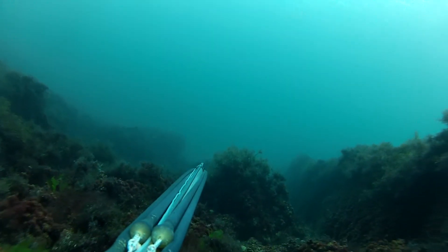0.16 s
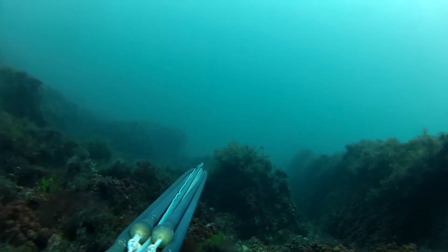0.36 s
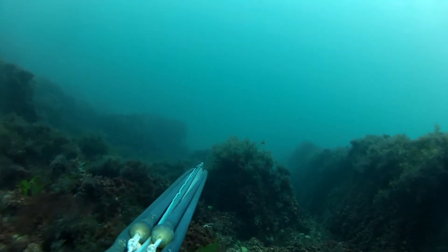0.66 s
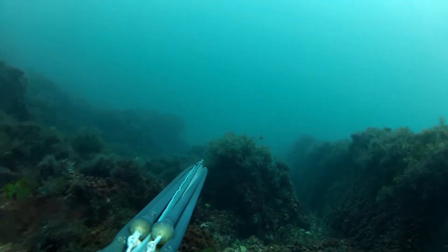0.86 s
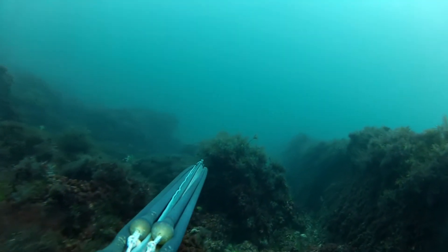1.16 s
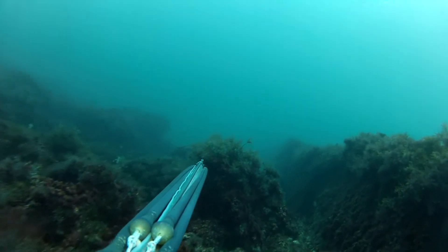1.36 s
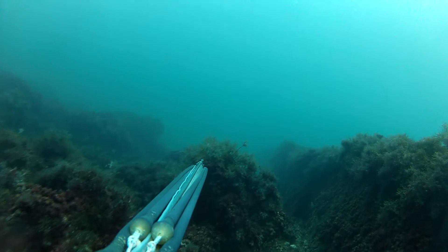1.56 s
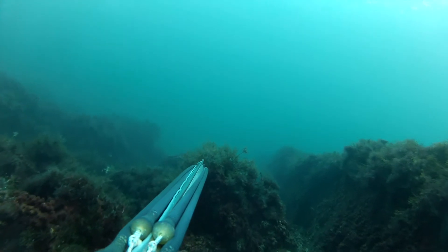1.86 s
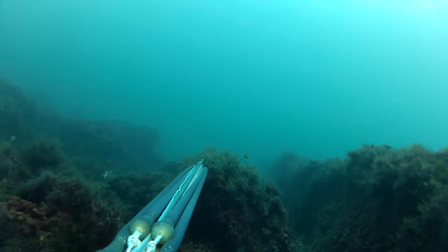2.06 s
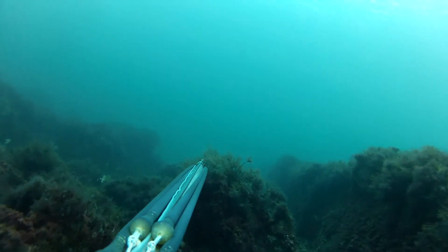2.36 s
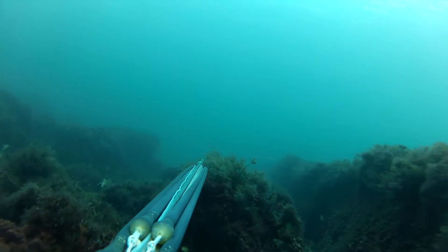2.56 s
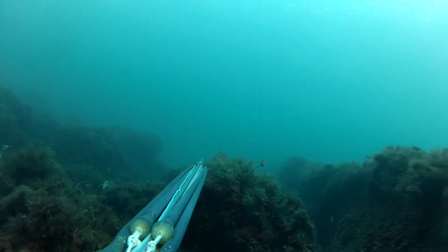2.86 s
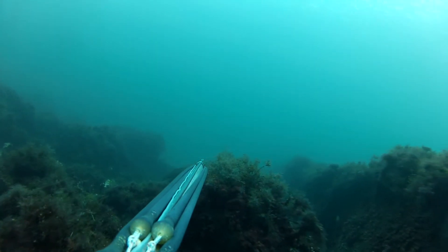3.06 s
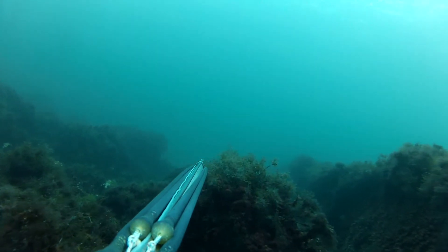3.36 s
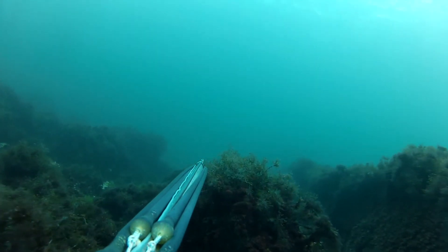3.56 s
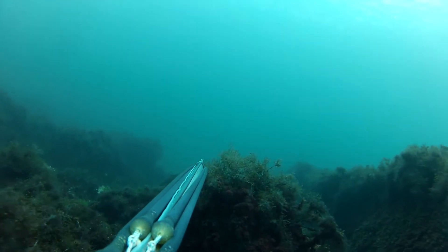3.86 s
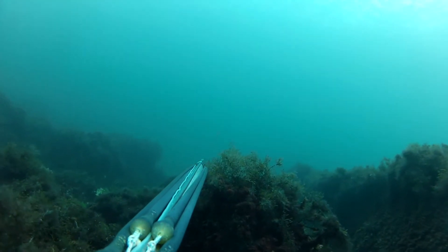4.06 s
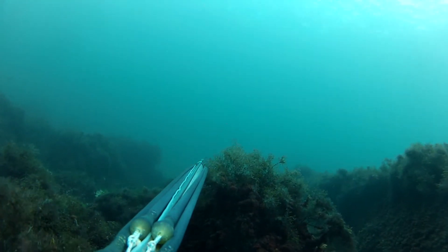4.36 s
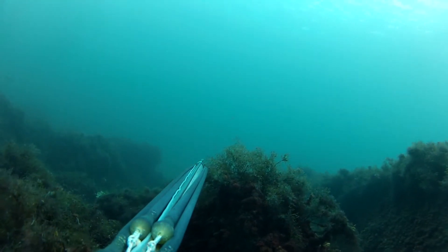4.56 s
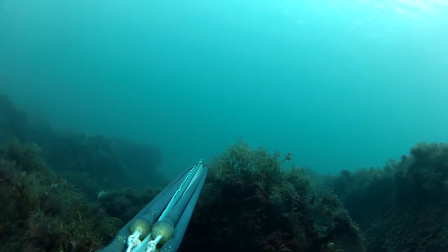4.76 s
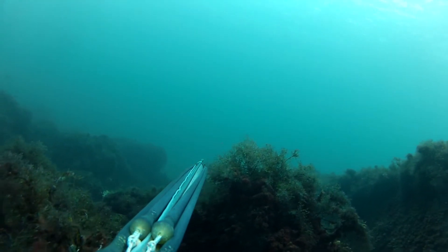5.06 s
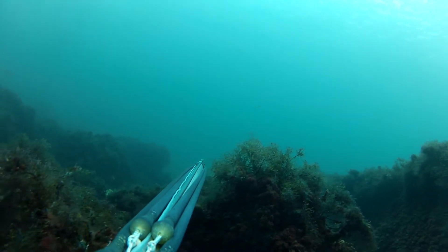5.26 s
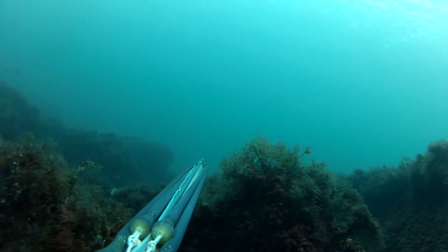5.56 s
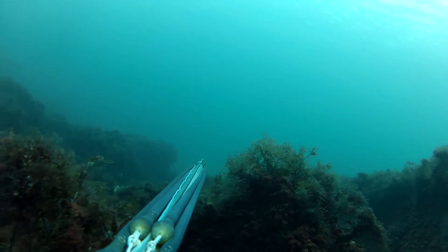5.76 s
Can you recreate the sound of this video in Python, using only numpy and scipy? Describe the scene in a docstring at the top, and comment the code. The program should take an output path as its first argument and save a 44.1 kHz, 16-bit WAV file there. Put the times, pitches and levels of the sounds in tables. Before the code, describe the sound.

A diver glides over a rocky reef with a speargun. Random small clicks crackle throughout above a soft, deep water rumble. Gear bumps its mount with short ringing thuds, first before one second, loudest around it and again near two. Rubber then squeals briefly after three seconds amid scraping and stuttering, before calming to ticks and faint bumps. The microphone is enclosed, so everything is dry, muffled and resonant.

```python
"""Over a reef, a diver glides along with a speargun, heard from inside a sealed camera housing.
Random clicks ring the housing's modes as shrimp crackle; coloured noise rumbles as water moves below.
The gear scrapes, judders, knocks and drags on its ringing mount, and rubber squeaks under the grip
as gliding notes and rasps. Held samples mirror the sound into a glassy treble."""
import sys
import numpy as np
from scipy import signal
from scipy.fft import rfft, irfft
from scipy.io import wavfile
from scipy.ndimage import uniform_filter1d

SR = 44100
rng = np.random.default_rng(int(sys.argv[2]) if len(sys.argv) > 2 else 0)


def wrap_up_sound(samples):
    """Save the sound to the file named by the first command line argument, as 16-bit audio."""
    columns = np.atleast_2d(samples).T
    # keep every value between -1 and 1, then stretch to whole-number steps
    tamed = np.clip(columns, -1, 1)
    steps = np.round(tamed * 32767).astype(np.int16)
    wavfile.write(sys.argv[1], SR, steps)


N = 260190
TIME = np.arange(N) / SR
TAIL = TIME[:SR // 3]  # time axis of one struck sound

# modes of the housing: pitch_hz, level_db (relative), t60_s
HOUSING = [(479, -6.5, 0.023), (774, -13, 0.047), (1020, 0, 0.0017), (1248, -10.5, 0.033),
           (1544, -13, 0.037), (1764, -1, 0.01), (2005, -6, 0.014), (2201, 2, 0.008), (2480, -0.5, 0.0064),
           (2740, -9.5, 0.011), (3570, -5, 0.0063), (4230, -10, 0.0033), (5210, -11, 0.0021)]
HOUSING_HZ = np.array(HOUSING)[:, 0]


def from_db(db):
    """Decibels to gain."""
    return 10 ** (np.asarray(db) / 20)


def rms_one(x):
    """Scale to unit power."""
    return x / np.sqrt(np.mean(x ** 2) + 1e-20)


def peak_one(x):
    """Scale to unit peak."""
    return x / (np.abs(x).max() + 1e-20)


def in_time(rows):
    """Each column of a curve at every sample."""
    s, *columns = np.transpose(rows)
    return [np.interp(TIME, s, column) for column in columns]


def add(out, start_s, sound):
    """Mix a sound in at its start time."""
    at = max(0, round(start_s * SR))
    out[at:at + len(sound)] += sound[:max(0, N - at)]


def noise(spectrum):
    """Steady noise of the given colour (rows of Hz and dB), rms 1."""
    hz, db = np.transpose(spectrum)
    grid = np.maximum(np.arange(N // 2 + 1) * SR / N, 1)
    gains = from_db(np.interp(np.log(grid), np.log(hz), db))
    return rms_one(irfft(rfft(rng.standard_normal(N)) * gains, N))


def mode(hz, t60):
    """One dying sine, down 60 dB after t60 seconds."""
    return np.sin(2 * np.pi * hz * TAIL) * np.exp(-np.log(1000) * TAIL / t60)


def ringing(modes, spread_db=0, colour_db=0):
    """A body's answer to one blow: its modes ring together, their strengths varied at random by spread_db."""
    hz, db, t60 = np.transpose(modes)
    gains = from_db(db + colour_db + spread_db * rng.standard_normal(len(hz)))
    # neighbouring modes start in opposite directions
    return sum((-1) ** k * gains[k] * mode(hz[k], t60[k]) for k in range(len(hz)))


def grains(per_s, size_db):
    """Random clicks of either sign, many small and a few large."""
    sizes = from_db(size_db * np.minimum(rng.exponential(1, N), 4))
    happens = rng.random(N) < per_s / SR
    return happens * sizes * rng.choice([-1, 1], N)


def click(colour_db, scatter, scatter_s):
    """A sharp pulse and its dense, dying reflections ring the housing; peak 1."""
    t = TAIL[:SR // 25]
    pulse = scatter * rng.standard_normal(len(t)) * np.exp(-t / scatter_s)
    pulse[0] += 1
    body = ringing(HOUSING, spread_db=4.5, colour_db=colour_db)
    return peak_one(signal.fftconvolve(pulse, body)[:len(TAIL)])


def wander():
    """Slow chance at the pace of the eddies, rms 1."""
    eddy_hz = 6
    return noise([(eddy_hz / 2, -10), (eddy_hz, 0), (10 * eddy_hz, -60), (SR, -200)])


def water():
    """The housing sways in the flow and eddies wash over it: two bands of noise with wandering levels."""
    # water flowing past: time_s, sway_db, wash_db
    flow = [(0.0, -54.5, -58), (0.8, -53.5, -57.5), (1.3, -55, -57.5), (1.9, -56, -56), (2.5, -55.5, -59),
            (3.3, -52, -58.5), (4.15, -58.5, -59), (4.8, -61, -57.5), (5.9, -58.5, -59.5)]
    # deep spectrum of the sway: frequency_hz, density_db (relative, per Hz)
    sway_spectrum = [(10, -8.5), (20, 9), (26, 4), (33, 0.5), (50, -8), (80, -55)]
    # broader spectrum of the wash: frequency_hz, density_db (relative, per Hz)
    wash_spectrum = [(30, -33), (60, 0), (90, 1.5), (140, -0.5), (250, -0.5), (470, -4.5), (620, -13),
                     (760, -12), (1000, -16), (2000, -23)]
    sway_wander_db, wash_wander_db = 1, 1.5
    sway_db, wash_db = in_time(flow)
    sway = from_db(sway_db + sway_wander_db * wander()) * noise(sway_spectrum)
    wash = from_db(wash_db + wash_wander_db * wander()) * noise(wash_spectrum)
    return sway + wash


def reef():
    """Countless far shrimp make a dull fizz; ticks stand out of it, each direction ringing the housing its way."""
    # the distant crackle: time_s, level_db
    crackle_levels = [(0.0, -60.5), (1.0, -65.5), (1.41, -63), (2.0, -61.5), (2.22, -62), (3.2, -61),
                      (4.78, -61), (5.6, -69), (5.9, -54.5)]
    level_db, = in_time(crackle_levels)
    octaves = np.log2(HOUSING_HZ / 2000)
    dull_housing = ringing(HOUSING, colour_db=-1.5 * octaves)
    fizz = signal.oaconvolve(grains(per_s=1500, size_db=2.0), dull_housing)[:N]
    ticks = np.zeros(N)
    for _ in range(6):  # directions
        shrimp = grains(per_s=22, size_db=3.2)
        ticks += signal.oaconvolve(shrimp, click(0, scatter=0.17, scatter_s=0.0015))[:N]
    crackle = 0.72 * rms_one(fizz) + 0.7 * rms_one(ticks)
    return from_db(level_db) * crackle


def snaps():
    """Near snaps and fainter random strays click on the housing, each with its own share of treble and bass."""
    # the nearest snaps and ticks: start_s, peak_db, treble_db, bass_db (colours relative to the middle)
    near = [(0.0084, -33.5, -5, -4), (0.1509, -35.5, -3, 3), (0.2191, -39, -13, 10), (0.2525, -38, 3, 10),
            (0.2724, -38, 6, 13), (0.3669, -39.5, 3, -13), (0.3769, -38.5, -10, 15),
            (0.4214, -39.5, 23, -8), (0.5665, -33, -6, 1), (0.6125, -39.5, 7, -7), (0.7023, -42.5, 4, 9),
            (0.996, -39, 21, -13), (1.0583, -37.5, 3.5, -7), (1.1722, -38.5, -3, 5.5),
            (1.4883, -33.5, -3, -3), (1.9031, -30.5, 14.5, 3.5), (2.1661, -32.5, -2, 9),
            (2.2104, -43.5, 5, 7), (2.4485, -33.5, 8.5, 8), (2.5841, -37.5, 2, -18), (2.6632, -40, -7, 9),
            (2.7122, -40.5, 7, 9), (2.8978, -40, 6, 2), (2.9858, -38.5, 5, 8), (3.0845, -34.5, 6, -5.5),
            (3.1678, -40, 11.5, -18), (3.2092, -25.5, -19, -3.5), (3.5952, -33, -1, -5),
            (3.6384, -37, 2, -4), (3.7312, -30, -1, -25), (3.8075, -29, -7, 2), (3.926, -32.5, -4.5, -10),
            (3.9802, -35.5, 1, -12), (4.2524, -36, -5, 6), (4.472, -37, 9, 1), (4.4952, -34.5, 8, -11),
            (4.5253, -39, -10, 5), (4.6676, -37, 12, -18), (4.6995, -40, 8, -3), (4.862, -37, 2.5, -7),
            (4.8828, -34, -6, -8), (4.9518, -39, 3, 4.5), (5.2949, -31.5, -7, -4), (5.4845, -41.5, -15, -4)]
    # strays: mean rate, mean peak level, and the largest deviations of level and colour
    strays_per_s, stray_db, stray_spread_db, stray_colour_db = 8, -45.5, 4.5, 4
    wait, size, treble, bass = rng.uniform(-1, 1, size=(120, 4)).T
    times = np.cumsum(-np.log(np.abs(wait))) / strays_per_s  # exponential waits
    levels_db = stray_db + stray_spread_db * size
    strays = np.transpose([times, levels_db, stray_colour_db * treble, stray_colour_db * bass])
    out = np.zeros(N)
    for start_s, peak_db, treble_db, bass_db in [*near, *strays[times < N / SR]]:
        colour_db = np.interp(HOUSING_HZ, [706, 1240, 1700, 2360, 3520], [bass_db, -3, 0, 0, treble_db])
        add(out, start_s, from_db(peak_db) * click(colour_db, scatter=0.1, scatter_s=0.005))
    return out


def scrapes():
    """Dense uneven catches of one surface on another ring the housing and, more faintly, the mount."""
    # gear scraping over the housing: start_s, length_s, level_db (rms)
    strokes = [(0.358, 0.058, -54.5), (0.708, 0.069, -55.5), (0.817, 0.016, -52), (1.781, 0.061, -56),
               (1.898, 0.037, -49), (3.205, 0.085, -50.5), (3.355, 0.038, -50), (3.649, .11, -51.5),
               (3.805, 0.057, -58), (4.073, 0.12, -53), (4.365, 0.028, -59), (4.428, 0.017, -44),
               (4.446, 0.088, -52.5), (4.825, 0.092, -53), (5.113, 0.063, -55.5), (5.3, 0.023, -52),
               (5.488, 0.048, -59)]
    pressure = np.zeros(N)
    for start_s, length_s, level_db in strokes:
        pressure[(TIME >= start_s) & (TIME < start_s + length_s)] = from_db(level_db)
    catches = rms_one(grains(per_s=1100, size_db=6.5))
    mount_hum = from_db(-14.5) * mode(hz=548, t60=0.18)
    body = ringing(HOUSING) + mount_hum
    return signal.oaconvolve(pressure * catches, body / np.linalg.norm(body))[:N]


def slipping():
    """Pitch, strength and roughness of the rubber's slips: one long squeal, and squeaks that drop onto their note."""
    # brief squeaks: start_s, length_s, pitch_hz, level_db (before trim), roughness (0-1)
    brief = [(0.563, 0.015, 1337, -38, 0.83), (0.764, .016, 1524, -33.5, 0.78),
             (1.412, 0.027, 1276, -47, 0.84), (1.442, .022, 1280, -44.5, 0.25),
             (1.469, .02, 1290, -53.5, 0.82), (1.533, .045, 1000, -59, 0.48),
             (2.13, 0.015, 1320, -49.5, 0.4), (3.016, 0.022, 1584, -46, 0.61),
             (3.056, 0.018, 1576, -51, 0.69), (3.08, .028, 1564, -49, .55), (3.648, .028, 1276, -40, .85),
             (3.67, 0.0199, 1620, -36.5, 0.66), (3.696, .06, 1668, -52.5, 0.87),
             (3.808, .026, 1330, -45, 0.57), (3.836, .032, 1259, -36.5, 0.42),
             (4.048, 0.015, 1780, -39.5, 0.59), (4.057, 0.034, 1200, -41, 0.58),
             (4.089, 0.029, 1235, -36.5, 0.36)]
    # the long squeal under the grip: time_s, pitch_hz, level_db (before trim), roughness (0-1)
    squeal = [(3.186, 1598, -47, 0.87), (3.248, 1660, -44, .9), (3.251, 1650, -34.5, 0.54),
              (3.259, 1253, -33, 0.02), (3.283, 1255, -29, 0), (3.288, 1272, -35, .5),
              (3.31, 1525, -41.5, 0.5), (3.314, 1690, -28, 0), (3.327, 1839, -34, 0),
              (3.362, 1810, -37, .05), (3.37, 1590, -49, .5), (3.397, 1612, -44.5, 0.6),
              (3.412, 1564, -65, 0.58)]
    # a squeak starts sharp by a share of its pitch and settles quickly; it swells and fades within its length
    sharp, settle_s, attack_s, release_s = 0.0798, 0.00299, 0.0029, 0.007
    pitch, squeal_db, rough = in_time(squeal)
    level = from_db(squeal_db) * (TIME >= squeal[0][0]) * (TIME < squeal[-1][0])
    for start_s, length_s, pitch_hz, level_db, roughness in brief:
        during = (TIME >= start_s) & (TIME < start_s + length_s)
        t = TIME[during] - start_s
        pitch[during] = pitch_hz * (1 + sharp * np.exp(-t / settle_s))
        swell = np.minimum(t / attack_s, 1)
        fade = np.minimum((length_s - t) / release_s, 1)
        level[during] = from_db(level_db) * swell * fade
        rough[during] = roughness
    return pitch, level, np.clip(rough, 0, 1)


def squeaks():
    """Regular slips of rubber sing a gliding note; irregular ones rasp in the rubber's resonances."""
    # resonances that rough slips excite: pitch_hz, level_db (relative), t60_s
    rubber = [(1274, -5.5, 0.27), (1571, -4.5, 0.12), (1730, 7, 0.011), (2364, -6, 0.067)]
    # waver of the slip rate and strength: frequency_hz, density_db
    unsteady = [(30, 0.5), (150, -2), (600, -9.0), (3000, -77)]
    pitch, level, rough = slipping()
    # two moving averages soften the jumps
    level, rough = uniform_filter1d(uniform_filter1d([level, rough], size=130), size=90)
    slip_rate = pitch * (1 + (0.008 + 0.06 * rough) * noise(unsteady))
    phase = 2 * np.pi * np.cumsum(slip_rate) / SR
    overtones = from_db(-23) * np.sin(2 * phase) + from_db(-48) * np.sin(3 * phase)
    note = np.sqrt(2) * (np.sin(phase) + (1 + rough) * overtones)
    rasp = rms_one(signal.oaconvolve(grains(per_s=800, size_db=3), ringing(rubber))[:N])
    flutter = from_db((1.4 + 3 * rough) * noise(unsteady))
    # equal-power blend from note to rasp
    blend = np.sqrt(np.maximum(1 - rough ** 2, 0)) * note + rough * rasp
    return from_db(-1.0) * level * flutter * blend


def judders():
    """Gear stuttering on the mount builds up a fluttering tone, which steps up on release and rings out."""
    # short judders: start_s, length_s, pitch_hz, level_db (before flutter)
    bursts = [(.7625, 0.016, 539, -18.5), (.774, 0.011, 187, -31.5), (.837, .004, 746, -34),
              (.884, 0.0033, 502, -36.5), (1.762, 0.024, 159, -36.5), (1.884, 0.008, 530, -37.5),
              (1.929, 0.0083, 206, -26.5), (3.677, 0.027, 554.5, -41), (3.741, 0.014, 552, -37),
              (3.844, 0.034, 556, -47), (4.167, 0.015, 553, -17.5), (4.38, 0.026, 557, -44.5),
              (4.554, 0.031, 549, -43.5)]
    release_rise, attack_s, release_t60_s = 0.03, 0.0036, 0.052  # rise as a share of the pitch
    out = np.zeros(N)
    for start_s, length_s, pitch_hz, level_db in bursts:
        phase = 2 * np.pi * np.cumsum(pitch_hz * (1 + release_rise * (TAIL > length_s))) / SR
        swell = 1 - np.exp(-TAIL / attack_s)
        ring_out = np.exp(-np.log(1000) * np.maximum(TAIL - length_s, 0) / release_t60_s)
        add(out, start_s, from_db(level_db) * swell * ring_out * np.sin(phase))
    flutter_db = 1.8 * noise([(20, -15), (80, 0), (180, 0), (500, -35), (2000, -80)])
    return out * from_db(flutter_db)


def knocks():
    """Each knock cracks on the housing, rings the mount, and sets the heavier gear thumping and swaying."""
    # gear knocking on the mount: start_s, body_db, crack_db, thump_db (all before trims), thump_hz
    blows = [(0.769, -17.5, -37, -37.5, 130), (0.825, -32, -47, -53, 121), (0.835, -22, -40, -41.5, 193),
             (1.292, -37, -57, -74, 121.2), (1.756, -30.5, -48.5, -46.5, 152), (1.799, -31, -69, -43, 162),
             (1.904, -15, -26.5, -34, 228), (1.944, -32.5, -42, -40.5, 219),
             (3.042, -29, -42.5, -46.5, 217), (3.219, -21.5, -49, -42, 225), (3.366, -35, -52, -55.5, 300),
             (3.799, -32.5, -33, -59, 306), (4.169, -36, -35, -41.5, 272), (4.36, -38.5, -47.5, -60, 310),
             (4.429, -40, -39, -47, 236), (5.138, -34, -43.5, -66, 203), (5.288, -34, -42, -81, 247)]
    # modes of the mount: pitch_hz, level_db (relative), t60_s
    mount = [(278, -2.5, 0.006), (449, 6, 0.022), (544, 4, 0.058), (660, -6, 0.011), (781.4, 0, 0.039)]
    # the sway relative to the listed level of a thump at heavy_hz; higher thumps sway less
    heavy_hz, sway_offset_db, sway_db_per_octave = 130, 7.5, -9
    out = np.zeros(N)
    octaves = np.log2(HOUSING_HZ / 1400)
    for start_s, body_db, crack_db, thump_db, thump_hz in blows:
        body = from_db(body_db - 1.5) * peak_one(ringing(mount, spread_db=2))
        crack = from_db(crack_db + 6.5) * click(-8 * np.abs(octaves), scatter=0.17, scatter_s=0.0039)
        thump_modes = mode(thump_hz, t60=0.12) + 0.5 * mode(1.56 * thump_hz, t60=0.027)
        thump = from_db(thump_db + 6) * thump_modes
        sway_db = thump_db + sway_offset_db + sway_db_per_octave * np.log2(thump_hz / heavy_hz)
        sway = from_db(sway_db) * (mode(hz=45.3, t60=0.31) - 0.98 * mode(hz=73.3, t60=0.138))
        add(out, start_s, body + crack + thump + sway)
    return out


def drag():
    """Small uneven slips keep the mount droning while the gear drags over it."""
    # modes of the drone: pitch_hz, level_db (relative), t60_s
    drone = [(143.9, 0, 0.11), (554.6, 1, 0.12)]
    start_s, end_s, level_db = 3.645, 3.99, -52
    slips = rms_one(grains(per_s=41, size_db=0.8)) * (TIME >= start_s) * (TIME < end_s)
    body = ringing(drone)
    return from_db(level_db) * signal.oaconvolve(slips, body / np.linalg.norm(body))[:N]


def scene():
    """One microphone inside the housing hears the sum of all sources, sent to both channels."""
    inside = water() + reef() + snaps() + scrapes() + squeaks() + judders() + knocks() + drag()
    return np.array([inside, inside])


def record(dry):
    """Sampling at 12 kHz and holding each value four times mirrors every tone around multiples of 12 kHz."""
    hiss = from_db(-79) * rng.standard_normal((2, N))  # separate in each channel
    narrow = signal.sosfilt(signal.butter(10, 5600, fs=SR, output="sos"), dry + hiss)
    sampled = signal.resample_poly(narrow, 12000, SR, axis=1)
    held = np.repeat(sampled, 4, axis=1)  # now at 48 kHz
    wide = signal.resample_poly(held, SR, 48000, axis=1)[:, :N]
    cutoff_hz = 15300  # steep upper limit of the mirrored treble
    return signal.sosfilt(signal.ellip(10, 0.2, 80, cutoff_hz, fs=SR, output="sos"), wide)


dry = scene()
out = record(dry)
wrap_up_sound(out)
```